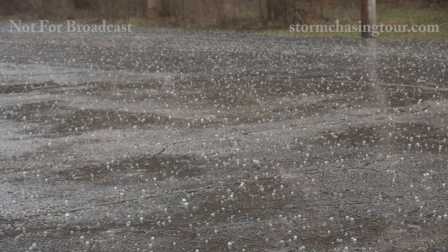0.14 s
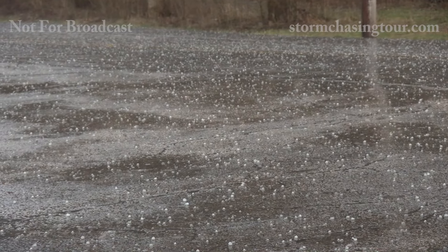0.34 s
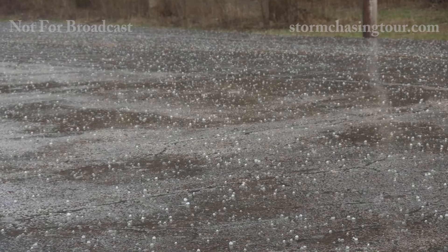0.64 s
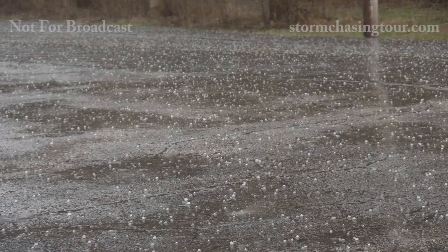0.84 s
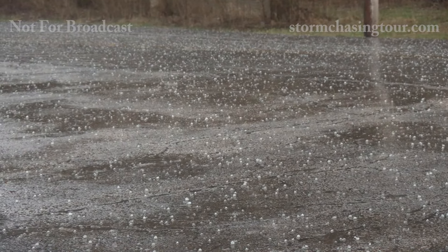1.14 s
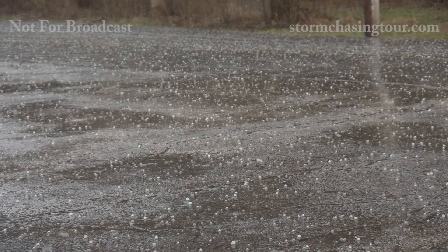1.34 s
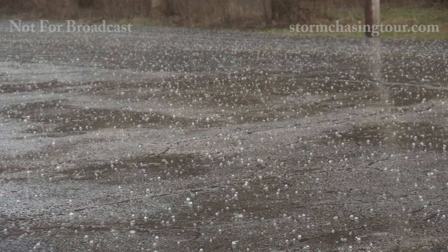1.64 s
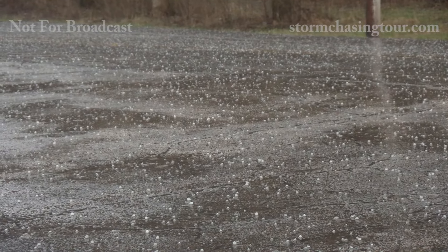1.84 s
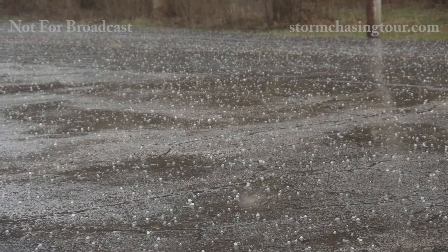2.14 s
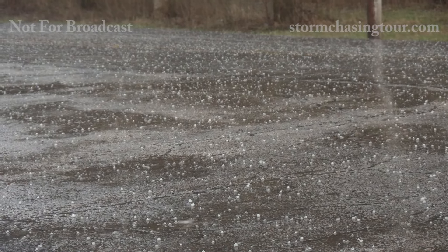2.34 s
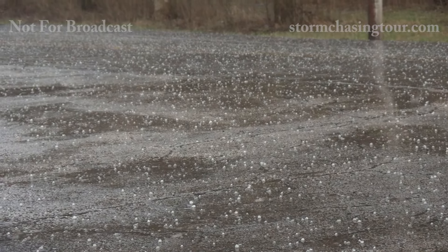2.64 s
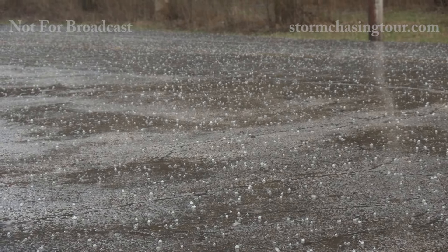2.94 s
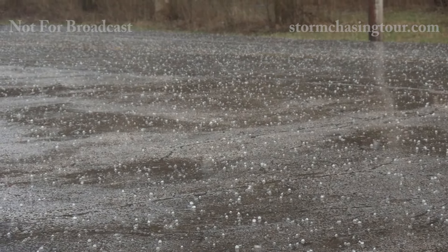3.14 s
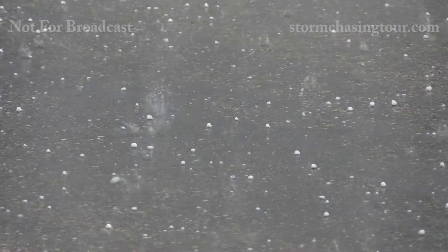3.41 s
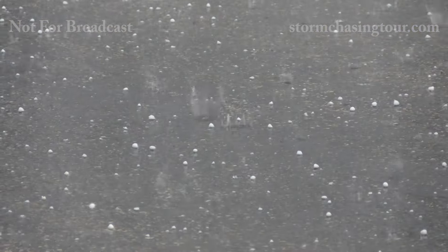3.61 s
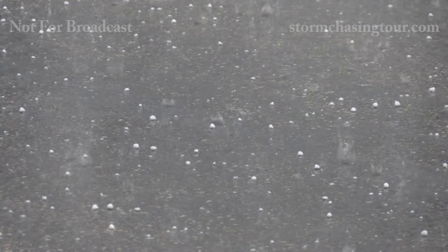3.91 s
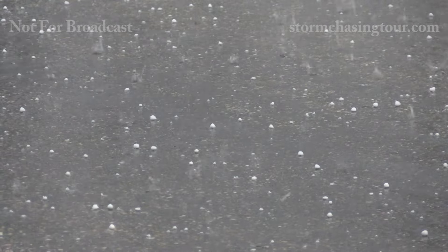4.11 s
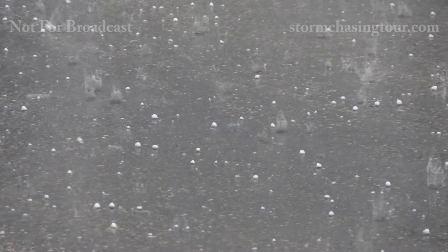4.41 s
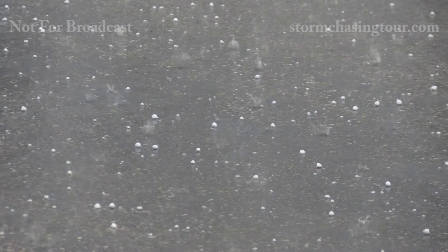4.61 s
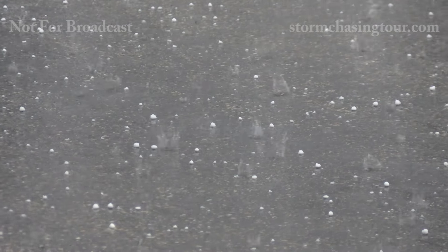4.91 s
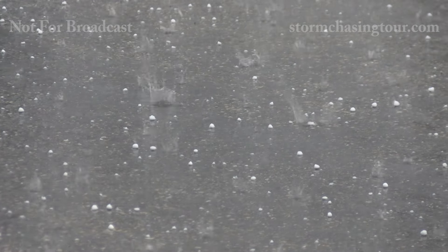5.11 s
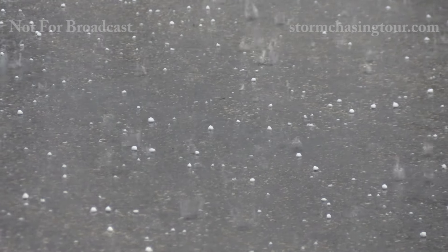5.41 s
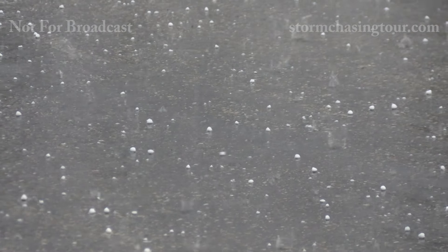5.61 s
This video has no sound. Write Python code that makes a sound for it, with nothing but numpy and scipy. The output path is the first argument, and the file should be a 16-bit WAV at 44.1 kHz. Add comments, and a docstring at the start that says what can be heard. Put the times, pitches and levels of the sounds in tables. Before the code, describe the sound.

Dense crisp sizzle of fine hail on pavement, suddenly switching to duller rain with loud irregular hollow knocks overhead.

```python
"""Small hail and rain fall on wet asphalt: random grains of noise make a hiss, small resonances tick.
Near stones knock, crack and spray: each sound is noise in its own band, shaped by a brief envelope.
From 3.05 s there is also a faint low rumble, made of filtered noise.
At 3.34 s, after a tiny silence, the listening place changes: the hiss is duller, and stones drum
on a hollow roof close by, where noise grains excite a few short resonances."""
import sys
import numpy as np
from scipy import signal
from scipy.io import wavfile

SR = 44100
rng = np.random.default_rng(int(sys.argv[2]) if len(sys.argv) > 2 else 0)


def unload_audio(sound):
    """Save the sound as a 16-bit wav file, at the path given as the first command line argument."""
    columns = np.transpose(np.atleast_2d(sound))
    # keep every value between -1 and 1, then stretch to whole-number steps
    steps = np.round(np.clip(columns, -1, 1) * 32767)
    wavfile.write(sys.argv[1], SR, steps.astype(np.int16))


N = 254016
TIME = np.arange(N) / SR
CHANGE_S = 3.341  # the listening place changes here
CUTOFF_HZ = 16100  # top of the finished sound

# strength of the shower in the open, before each layer's offset: t/s, hiss level/dB
OPEN_FALL = [(0.0, -28.5), (0.15, -33.5), (1.0, -31), (1.45, -32), (1.73, -30.7), (2.11, -32), (3.3, -29.5)]
# strength of the shower by the roof, hiss before each layer's offset: t/s, hiss level/dB, drumming level/dB
ROOF_FALL = [(3.36, -30.5, -29), (3.49, -29, -22.5), (3.72, -33, -27.5), (3.97, -33, -22.5),
             (4.21, -30.5, -29.5), (4.9, -33, -26.5), (5.4, -34, -31), (5.76, -31.5, -28.5)]
# faint low rumble before the change: t/s, level/dB
RUMBLE = [(3.05, -70), (3.17, -65), (3.27, -54), (3.33, -61)]
# tone colour of each layer, only relative: f/Hz, level per Hz/dB
OPEN_HISS = [(60, -50), (130, -44), (250, -28.5), (500, -18), (800, -9), (1200, -3.5), (1700, 1.5),
             (3200, 4), (5000, 3), (8000, 0.5), (11000, -3.5), (13500, -10), (16000, -18)]
ROOF_HISS = [(500, 10.5), (1200, 2.5), (2200, 1), (3500, -1), (5000, -2), (8000, -8), (11000, -10.5),
             (13500, -17.5), (16000, -23)]
ROOF_DRUM = [(45, -14), (70, -12), (105, -11.5), (170, -3), (320, 1), (700, -5), (1100, -1.5),
             (1600, -13.5), (2500, -30), (4000, -25)]
# how alike left and right are: f/Hz, likeness (1 same, 0 unrelated, -1 opposite)
OPEN_LIKENESS = [(600, .999), (1400, 1), (2200, 0.95), (3100, 0.41), (4500, -0.32), (7000, -0.25),
                 (15000, -0.59)]
ROOF_LIKENESS = [(50, 0.83), (140, 0.91), (300, 0.96), (650, 0.86), (1400, 0.39), (3100, 0.1), (7000, 0.31),
                 (15000, 0.69)]
# resonances of the roof panel: f/Hz, width/Hz, level/dB
ROOF_MODES = [(173, 32, 0.5), (265, 30, -7), (368, 78, -3), (452, 15, -6.5), (653, 42, -2.5), (740, 38, 0)]
# In the stone tables, levels are before the small trims in near_stones(). The basic t60
# (time to fall by 60 dB) is stretched or shortened there for each part of the sound.
# loudest stones on the asphalt: t/s, knock level/dB, crack f/Hz, crack level/dB, spray level/dB, t60/s
GROUND_STONES = [(0.0043, -27.5, 3220, -48, -35, 0.076), (0.0818, -30, 4230, -20, -28, .014),
                 (0.105, -32, 3100, -24.5, -29, 0.026), (0.1276, -27.5, 3580, -31, -22.5, 0.052),
                 (0.2962, -25, 3860, -24.5, -20, 0.021), (0.4423, -18, 3000, -16.5, -26, .048),
                 (0.5482, -17.5, 2920, -20, -26.5, 0.028), (0.6371, -29, 3500, -17, -20.5, .048),
                 (0.6584, -29, 3600, -29, -30, 0.062), (0.8351, -30.5, 2960, -32, -34, 0.01),
                 (0.9037, -25.5, 3780, -25, -28.5, 0.044), (0.957, -33, 3760, -27, -27, .013),
                 (0.9745, -17.5, 2480, -35, -24.5, .012), (1.1262, -23.5, 2700, -26, -30, 0.059),
                 (1.181, -19, 3350, -19, -26, 0.027), (1.2272, -48, 4820, -21.5, -27, .015),
                 (1.2499, -25.5, 3700, -25.5, -34, 0.092), (1.279, -43, 4200, -24.5, -28, .01),
                 (1.455, -28.5, 4700, -33, -38, 0.053), (1.472, -36, 4130, -19.5, -22.5, 0.0099),
                 (1.567, -46, 4300, -23.5, -25, .016), (1.5801, -40, 4760, -28, -18.5, .024),
                 (1.6593, -35.5, 4400, -25.5, -27.5, 0.026), (1.7438, -29, 4400, -28, -26.5, 0.071),
                 (1.8015, -18.5, 4670, -18.5, -27, 0.081), (1.8356, -42, 4700, -29, -19, 0.0086),
                 (1.9061, -41, 3780, -19, -24.5, 0.044), (1.9311, -21.5, 3680, -19.5, -35, 0.043),
                 (2.134, -29, 3480, -23.5, -24.5, 0.039), (2.2298, -17.5, 3260, -14, -23, 0.079),
                 (2.2728, -25.5, 3360, -20, -23, 0.053), (2.3898, -25.5, 2980, -31, -29, 0.083),
                 (2.4317, -37, 3250, -29, -32, .012), (2.6445, -42, 4800, -22, -21.5, 0.0079),
                 (2.7003, -36, 2480, -28, -46, 0.012), (2.9485, -22, 4140, -23, -23, 0.031),
                 (3.0089, -30, 3500, -17.5, -26, 0.0099), (3.0279, -25.5, 3100, -20, -23.5, 0.081),
                 (3.216, -27, 4440, -27.5, -33, 0.0077), (3.2612, -47, 4900, -41, -23, .015),
                 (3.2772, -38, 3450, -27.5, -19, 0.013), (3.2895, -22.5, 3500, -33, -44, 0.048)]
# loudest stones on the roof: t/s, knock f/Hz, knock level/dB, crack f/Hz, crack level/dB,
# spray level/dB, t60/s, left over right level/dB
ROOF_STONES = [(3.3564, 560, -21.5, 3130, -28, -34.5, 0.037, -5),
               (3.3995, 870, -17.5, 4170, -25, -28.5, 0.048, -1),
               (3.442, 1130, -23, 3880, -26, -35, .057, 0), (3.463, 530, -16.5, 2900, -34, -44, .07, 0),
               (3.5829, 990, -18, 3150, -23, -20, 0.018, 0), (3.614, 590, -33, 3020, -20.5, -34, 0.017, 4),
               (3.6954, 700, -18.5, 3100, -29.5, -42, 0.031, -6),
               (3.7815, 1320, -24.5, 4000, -21.5, -26, .049, 2),
               (3.862, 604, -11, 2700, -24.5, -40, 0.062, 0.5),
               (3.9373, 780, -16.5, 3000, -39, -41, .04, 1), (3.956, 580, -14.5, 2900, -44, -44, 0.11, -2),
               (4.0092, 710, -21, 3100, -30, -45, .038, -5), (4.0629, 790, -15, 2800, -28, -46, .04, -1.5),
               (4.1108, 1050, -20.5, 3580, -24.5, -40, 0.09, 1),
               (4.2665, 720, -11.5, 2860, -27.5, -40, .048, -0.5),
               (4.363, 376, -23, 3400, -21, -33.5, 0.023, -2), (4.402, 620, -22, 3200, -28, -44, .08, -3),
               (4.456, 746, -27, 4080, -23.5, -38, 0.015, -3),
               (4.4805, 563, -22.5, 3450, -21, -34, 0.032, -7.5),
               (4.5724, 625, -19, 2900, -35, -45, 0.056, -1),
               (4.688, 690, -16.5, 3000, -42, -45, 0.046, -1),
               (4.7091, 676, -20.5, 2680, -28, -45, 0.11, -1), (4.747, 660, -22, 2920, -21, -26, .03, -6),
               (4.8271, 670, -12.5, 2900, -29, -46, 0.064, 0),
               (4.8848, 784, -15, 3130, -19, -32, 0.054, 1.5),
               (4.9118, 524, -20.5, 4200, -28.5, -47, 0.1, -1),
               (4.9664, 690, -16.5, 3840, -28, -33, 0.027, -2),
               (5.103, 940, -22.5, 2700, -48, -53, 0.058, 0),
               (5.2342, 1050, -24.5, 2770, -18, -39, 0.016, -5),
               (5.5569, 570, -30, 4340, -25.5, -38, 0.044, -1),
               (5.6588, 1260, -22, 2520, -17.5, -30, 0.022, 4),
               (5.683, 647, -17.5, 3100, -48, -48, .088, 0)]
# typical faint stone: knock f/Hz, knock level/dB, crack f/Hz, crack level/dB, spray level/dB, t60/s
# (the negative t60 on the ground makes every faint stone there a pure snap)
FAINT_GROUND = (1550, -38, 3900, -35.5, -32, -0.02)
FAINT_ROOF = (620, -23.5, 3500, -32, -37.5, 0.13)
FAINT_SPREAD_DB, FAINT_PITCH_OCTAVES, FAINT_T60_OCTAVES = 2.5, 0.24, 0.53  # their scatter

# on asphalt, a stone that splashes longer knocks lower and broader
GROUND_KNOCK_HZ, KNOCK_FALL_OCTAVES_PER_S = 1836, 3.94
GROUND_KNOCK_OCTAVES, KNOCK_WIDENS_OCTAVES_PER_S = 0.48, 13.4
GROUND_PAN_DB = 0.2  # left over right
# a harder blow on the roof knocks more purely: width at a reference level, and its fall
ROOF_OCTAVES, ROOF_REFERENCE_DB, ROOF_NARROWS_OCTAVES_PER_DB = 1.84, -18.5, 0.1
SNAP_FADE_S = 0.016  # the first snap's share falls by 1/e for each such step of t60
# the spray climbs in pitch as it outweighs the crack, fully at this lead
SPRAY_HZ, SPRAY_RISE_OCTAVES, SPRAY_LEAD_DB = 7230, 0.32, 12


def from_db(db):
    """Turn decibels into a plain gain."""
    return np.exp(np.asarray(db) * np.log(10) / 20)


def rms_one(x):
    """Scale a signal to an average power of 1."""
    return x / np.sqrt(np.mean(x ** 2) + 1e-20)


def in_time(rows, t):
    """Read each column of a table at the times t, with straight lines between its points."""
    s, *columns = np.transpose(rows)
    return [np.interp(t, s, column) for column in columns]


def at_hz(points, hz):
    """Read a table at a frequency; equal pitch steps count equally, as for the ear."""
    table_hz, values = np.transpose(points)
    return np.interp(np.log(hz), np.log(table_hz), values)


def band(x, low_hz, high_hz):
    """Keep mainly the frequencies between two limits."""
    b, a = signal.butter(2, [low_hz, high_hz], "band", fs=SR)
    return signal.lfilter(b, a, x)


def ring(x, hz, width_hz):
    """A resonance: each push rings at one pitch, longer when narrower; gain 1 at its peak."""
    r = np.exp(-np.pi * width_hz / SR)
    b = np.array([1, 0, -r]) * (1 - r)
    a = [1, -2 * r * np.cos(2 * np.pi * hz / SR), r * r]
    return signal.lfilter(b, a, x + 1e-18)


def stereo(pair, alike):
    """Mix a shared signal and an opposed one, so left and right are as alike as asked."""
    alike = np.clip(alike, -1, 1)
    shared = np.sqrt((1 + alike) / 2) * pair[0]
    opposed = np.sqrt((1 - alike) / 2) * pair[1] * [[1], [-1]]
    return shared + opposed


def faint_rumble(t):
    """A faint low rumble: noise in a low band, with its level drawn over time."""
    level_db, = in_time(RUMBLE, t)
    noise = rms_one(band(rng.standard_normal(len(t)), 120, 340))
    return from_db(level_db) * (t > RUMBLE[0][0]) * noise


def patter(n, spectrum, likeness, per_s, spread_db, colour_db, ring_s, cycles, wash):
    """Random impacts of uneven size and colour, as fading noise over a smooth wash of far ones; rms 1."""
    at = rng.integers(0, n, int(per_s * n / SR))
    # many small impacts, few large ones
    size_db = spread_db * np.minimum(-np.log(np.linspace(1, 0, len(at), endpoint=False)), 4)
    edges = 44 * 2 ** np.arange(0, 9, .5)  # half-octave bands
    edges = edges[(edges > spectrum[0][0] / 2) & (edges < spectrum[-1][0] * 2)]
    white = rng.standard_normal((2, 2, n))
    out = 0
    for k, (low, high) in enumerate(zip(edges, edges[1:])):
        hz = np.sqrt(low * high)
        impact_db = size_db + colour_db * rng.standard_normal(len(at))
        energy = np.bincount(at, from_db(impact_db) ** 2, n)
        # low pitches ring longer
        decay = np.exp(-1 / (SR * (ring_s + cycles / hz)))
        energy = signal.lfilter([1], [1, -decay], energy + 1e-18)
        # neighbouring bands use different noise
        grains = white[k % 2] * np.sqrt(energy / energy.mean() + wash)
        out = out + from_db(at_hz(spectrum, hz)) * stereo(band(grains, low, high), at_hz(likeness, hz))
    return rms_one(out)


def pellets(n, likeness, per_s, spread_db, low_hz, high_hz, sharpness, tilt_db, count=14):
    """Small pellets tick dryly: clicks of uneven size through a row of short resonances; rms 1."""
    out = 0
    each = max(int(per_s * n / SR / count), 2)
    for hz in np.geomspace(low_hz, high_hz, count):
        at = rng.integers(0, n - SR // 100, each)
        size = from_db(spread_db * np.linspace(-2, 2, each))
        size = size * rng.standard_normal((2, each)).clip(-1.5, 1.5)
        clicks = np.zeros((2, n))
        clicks[:, at] = size
        # a tumbling pellet touches again at once
        again = at + (rng.uniform(.0003, .003, each) * SR).astype(int)
        clicks[:, again] += 0.52 * size[::-1]
        tick = rms_one(ring(clicks, hz, hz / sharpness))
        out = out + from_db(tilt_db * np.log2(hz / low_hz)) * stereo(tick, at_hz(likeness, hz))
    return rms_one(out)


def open_shower(t):
    """Fine hail and rain on the asphalt all around: dense noise grains and bright, dry ticks."""
    hiss_db, = in_time(OPEN_FALL, t)
    hiss = patter(len(t), OPEN_HISS, OPEN_LIKENESS, per_s=800, spread_db=2.5, colour_db=5.0,
                  ring_s=0.00044, cycles=1.3, wash=0.98)
    ticks = pellets(len(t), OPEN_LIKENESS, per_s=260, spread_db=6.0, low_hz=2170, high_hz=11700,
                    sharpness=7.2, tilt_db=1.5)
    return from_db(hiss_db + 1.0) * hiss + from_db(hiss_db - 5.5) * ticks


def roof_drumming(n):
    """Many stones drum on the hollow roof, and its panel resonates briefly with them; rms 1."""
    drum = patter(n, ROOF_DRUM, ROOF_LIKENESS, per_s=130, spread_db=0.5, colour_db=3.5,
                  ring_s=0.003, cycles=0.75, wash=0.22)
    panel = sum(from_db(db) * ring(drum, hz, width_hz) for hz, width_hz, db in ROOF_MODES)
    return rms_one(drum + from_db(0.5) * panel)


def roof_shower(t):
    """A duller hiss and ticks from the ground, with drumming on the roof."""
    hiss_db, drum_db = in_time(ROOF_FALL, t)
    hiss = patter(len(t), ROOF_HISS, ROOF_LIKENESS, per_s=750, spread_db=3.0, colour_db=4.0,
                  ring_s=0.00047, cycles=1.9, wash=1.4)
    ticks = pellets(len(t), ROOF_LIKENESS, per_s=59, spread_db=6.0, low_hz=1920, high_hz=10400,
                    sharpness=3.5, tilt_db=-6.5)
    ground = from_db(hiss_db + 3) * hiss + from_db(hiss_db - 5.5) * ticks
    return ground + from_db(drum_db) * roof_drumming(len(t))


def snap_share(t60):
    """A hard stone is nearly all snap, a slushy one nearly all splash."""
    return np.exp(-t60 / SNAP_FADE_S)


def faint_stones(start_s, end_s, typical, octaves, knock_scatter_octaves, count):
    """Stones a little farther off, scattered in time, strength, pitch and length around a typical one."""
    knock_hz, knock_db, crack_hz, crack_db, spray_db, t60 = typical
    times = start_s + (end_s - start_s) * (np.arange(count) + rng.random(count)) / count
    stones = []
    for s, chance in zip(times, rng.standard_normal((count, 5)).clip(-2, 2)):
        knock, crack, spray = [knock_db, crack_db, spray_db] + FAINT_SPREAD_DB * chance[:3]
        # knock and crack go up or down together
        low_hz = knock_hz * 2 ** (knock_scatter_octaves * chance[3])
        high_hz = crack_hz * 2 ** (FAINT_PITCH_OCTAVES * chance[3])
        length = t60 * 2 ** (FAINT_T60_OCTAVES * chance[4])
        stones.append((s, low_hz, octaves, knock, high_hz, crack, spray, snap_share(length), length, 0))
    return stones


def ground_stone(s, knock_db, crack_hz, crack_db, spray_db, t60):
    """The length of the splash sets the pitch and width of the knock on asphalt."""
    knock_hz = GROUND_KNOCK_HZ * 2 ** (-KNOCK_FALL_OCTAVES_PER_S * t60)
    octaves = GROUND_KNOCK_OCTAVES + KNOCK_WIDENS_OCTAVES_PER_S * t60
    return (s, knock_hz, octaves, knock_db, crack_hz, crack_db, spray_db,
            snap_share(t60), t60, GROUND_PAN_DB)


def roof_stone(s, knock_hz, knock_db, crack_hz, crack_db, spray_db, t60, pan_db):
    """A hollow knock, narrower in pitch the harder the stone hits."""
    octaves = max(ROOF_OCTAVES - ROOF_NARROWS_OCTAVES_PER_DB * (knock_db - ROOF_REFERENCE_DB), .5)
    return s, knock_hz, octaves, knock_db, crack_hz, crack_db, spray_db, snap_share(t60), t60, pan_db


def all_stones():
    """The loud stones and the faint ones between them, in both places."""
    ground = [ground_stone(*row) for row in GROUND_STONES]
    roof = [roof_stone(*row) for row in ROOF_STONES]
    faint_ground = faint_stones(0, CHANGE_S, FAINT_GROUND, octaves=.85, knock_scatter_octaves=.07, count=30)
    faint_roof = faint_stones(CHANGE_S, N / SR, FAINT_ROOF, octaves=2.07, knock_scatter_octaves=.25, count=16)
    return ground + roof + faint_ground + faint_roof


def impact_shape(t60, snap, snap_t60, rise_share, tail_db, tail_t60, lumpy_db):
    """Loudness over time: a dry snap, then an uneven splash and a diffuse tail of early reflections."""
    t = np.arange(SR // 8) / SR
    front = from_db(-60 * np.minimum(t / snap_t60, 3))
    swell = 1 - np.exp(-t / (rise_share * t60))
    lumps = np.interp(t, t[::30], rng.standard_normal(len(t[::30])))
    # the square root offsets the reflections' longer duration, to steady their share of the energy
    reflections = from_db(tail_db - 60 * t / tail_t60) * np.sqrt(t60 / tail_t60)
    splash = swell * from_db(lumpy_db * lumps) * (from_db(-60 * t / t60) + reflections)
    snap = np.clip(snap, 0, 1)
    return np.sqrt(snap * rms_one(front) ** 2 + (1 - snap) * rms_one(splash) ** 2)


def burst(shape, hz, octaves, likeness):
    """An impact heard through one broad resonance: shaped noise with the energy of 10 ms at level 1."""
    half = 2 ** (octaves / 2)
    pair = band(rng.standard_normal((2, len(shape))) * shape, hz / half, hz * half)
    return stereo([rms_one(p) for p in pair], at_hz(likeness, hz)) * np.sqrt(.01 * SR / len(shape))


def near_stones():
    """Each stone knocks on what it hits, cracks as ice, and throws a brief spray."""
    out = np.zeros((2, N + SR))
    for s, knock_hz, octaves, knock_db, crack_hz, crack_db, spray_db, snap, t60, pan_db in all_stones():
        on_ground = s < CHANGE_S
        likeness = OPEN_LIKENESS if on_ground else ROOF_LIKENESS
        t60 = max(t60, .003)
        knock_shape = impact_shape(t60 * 1.31, snap * 0.78 + 0.039, snap_t60=0.0035, rise_share=0.023,
                                   tail_db=-6.0, tail_t60=0.2, lumpy_db=1.1)
        crack_shape = impact_shape(t60 * 0.62, snap + 0.19, snap_t60=0.0093, rise_share=0.12,
                                   tail_db=-9.5, tail_t60=0.077, lumpy_db=5.5)
        spray_shape = impact_shape(t60 * 0.77, snap + 0.16, snap_t60=0.0039, rise_share=0.022,
                                   tail_db=-6, tail_t60=0.39, lumpy_db=3.0)
        knock = burst(knock_shape, knock_hz, octaves, likeness)
        thud = from_db(-23.5) * burst(knock_shape, knock_hz * 0.47, 1.5, likeness)
        # a short dry hit is narrow in pitch, a long splash broad; short hits on the hard roof are purer
        crack_octaves = .5 + 9 * t60 if on_ground else 0.32 + 10.5 * t60
        crack = burst(crack_shape, crack_hz, crack_octaves, likeness)
        fineness = np.clip((spray_db - crack_db) / SPRAY_LEAD_DB, 0, 1)
        spray_hz = SPRAY_HZ * 2 ** (SPRAY_RISE_OCTAVES * fineness)
        spray = burst(spray_shape, spray_hz, 1.07, likeness)
        hit = from_db(knock_db - 0.62) * (knock + thud)
        hit = hit + from_db(crack_db - 0.64) * crack
        hit = hit + from_db(spray_db + 0.4) * spray
        start = round(s * SR)
        out[:, start:start + hit.shape[1]] += hit * from_db([[pan_db / 2], [-pan_db / 2]])
    return out[:, :N]


def scene():
    """One place gives way to the other through a few milliseconds of silence."""
    before, after = TIME[TIME < CHANGE_S], TIME[TIME >= CHANGE_S]
    shower = np.hstack([faint_rumble(before) + open_shower(before), roof_shower(after)])
    # silent for 2 ms on either side, with 9.1 ms ramps beyond
    fade = np.clip((np.abs(TIME - CHANGE_S) - .002) / 0.0091, 0, 1)
    return fade * (shower + near_stones())


def record(dry):
    """The deepest bass is lost, the sharpest peaks are rounded, the top is cut."""
    thin = signal.sosfilt(signal.butter(2, 30, "high", fs=SR, output="sos"), dry)
    rounded = thin / (1 + (thin / .9) ** 8) ** .125
    return signal.sosfilt(signal.ellip(12, .1, 90, CUTOFF_HZ, fs=SR, output="sos"), rounded)


dry = scene()
out = record(dry)
unload_audio(out)
```